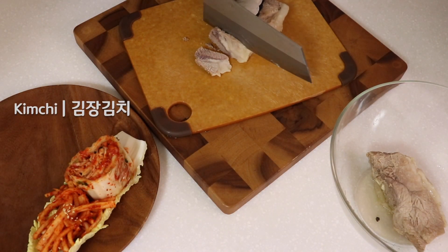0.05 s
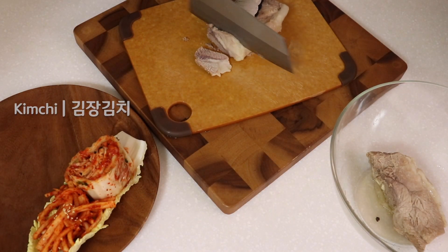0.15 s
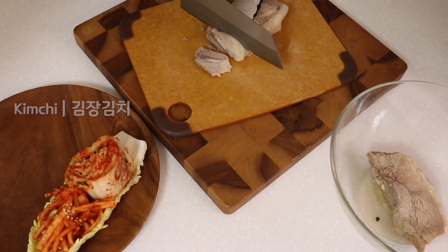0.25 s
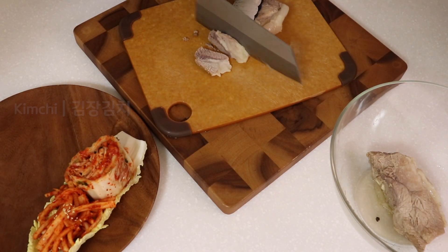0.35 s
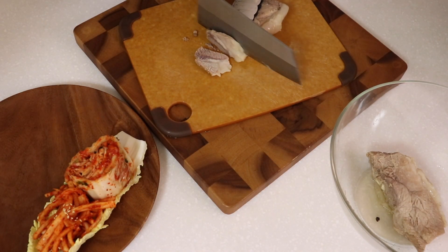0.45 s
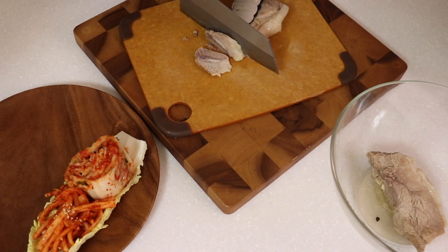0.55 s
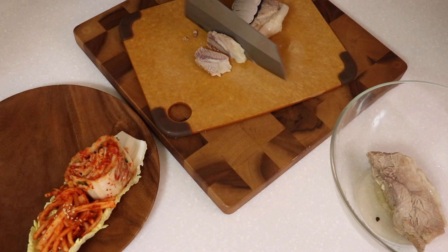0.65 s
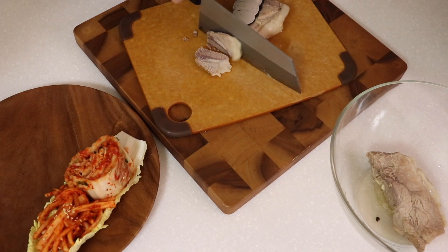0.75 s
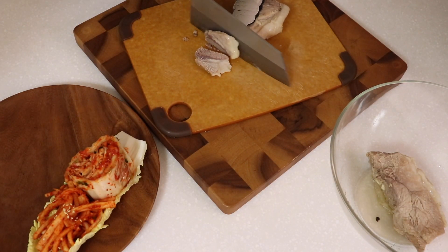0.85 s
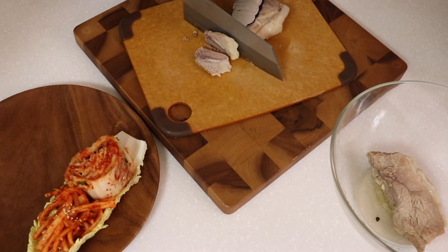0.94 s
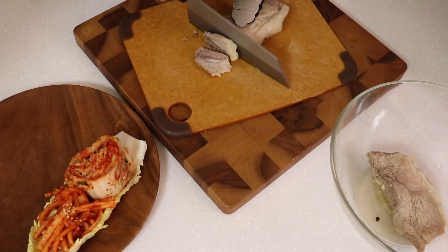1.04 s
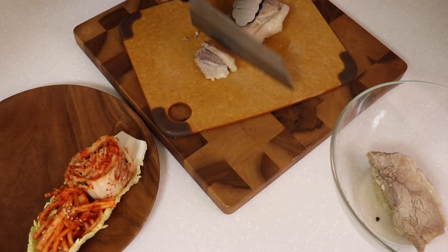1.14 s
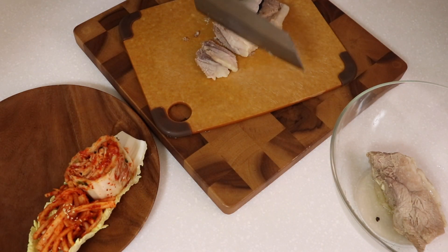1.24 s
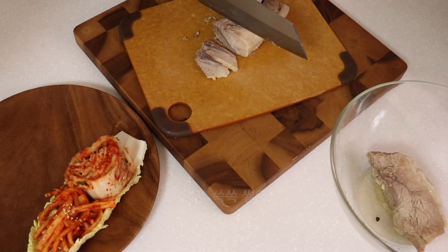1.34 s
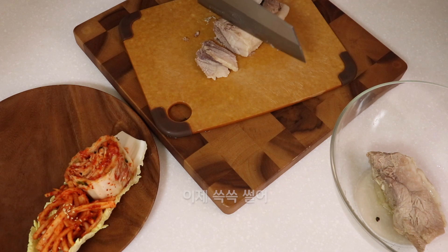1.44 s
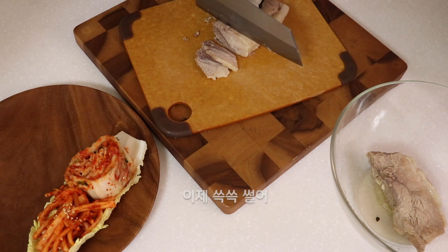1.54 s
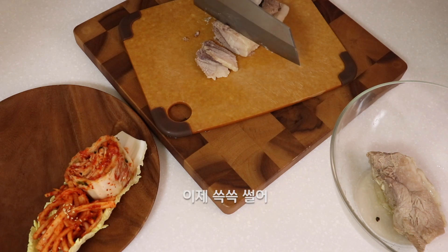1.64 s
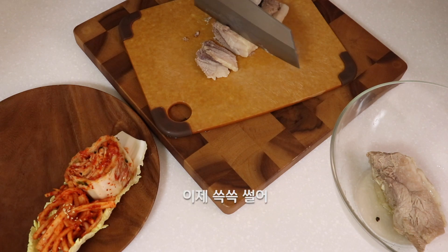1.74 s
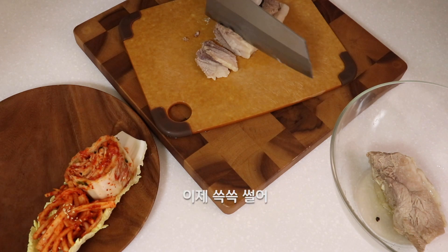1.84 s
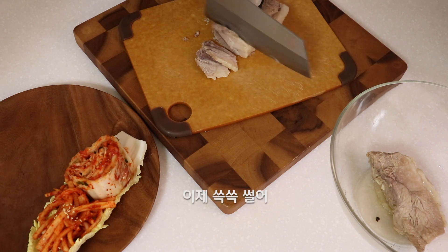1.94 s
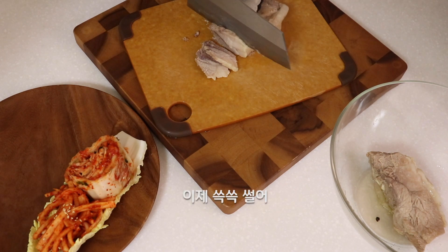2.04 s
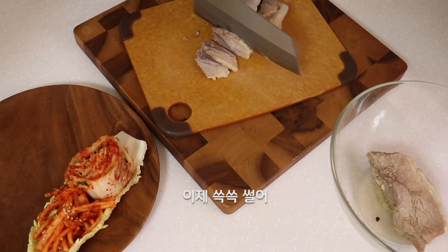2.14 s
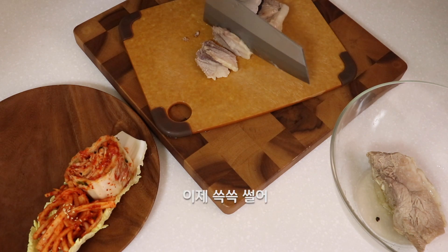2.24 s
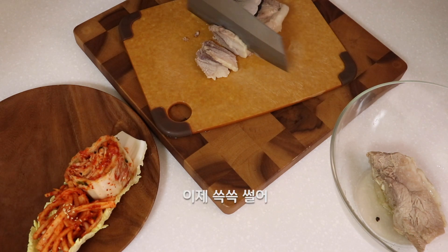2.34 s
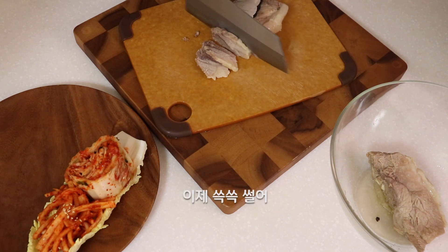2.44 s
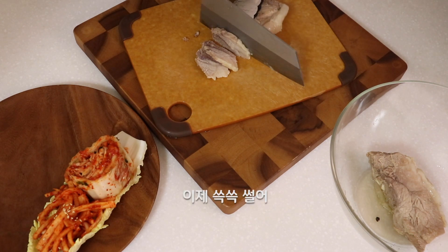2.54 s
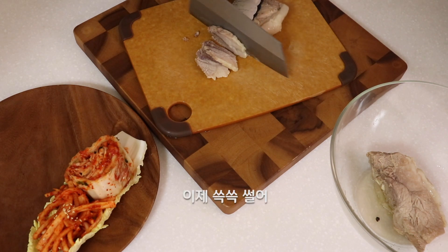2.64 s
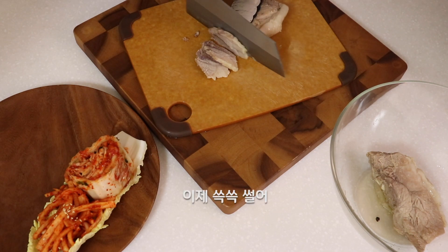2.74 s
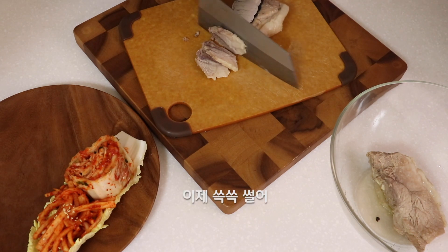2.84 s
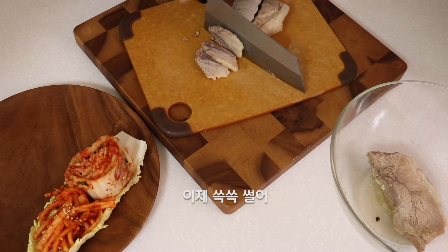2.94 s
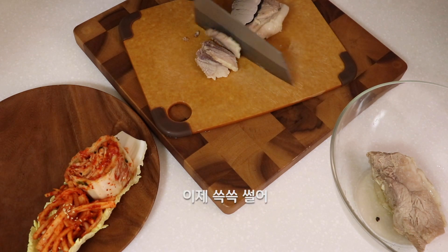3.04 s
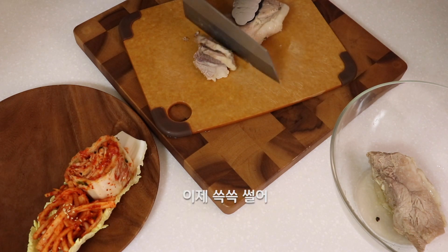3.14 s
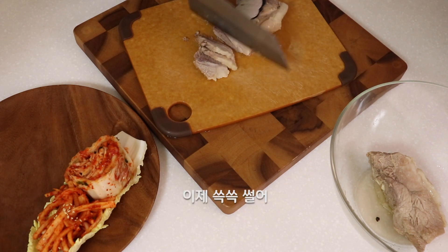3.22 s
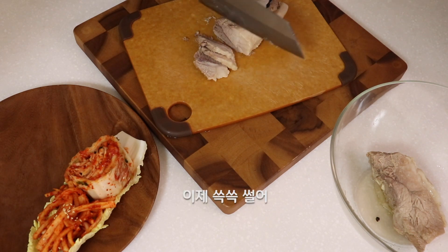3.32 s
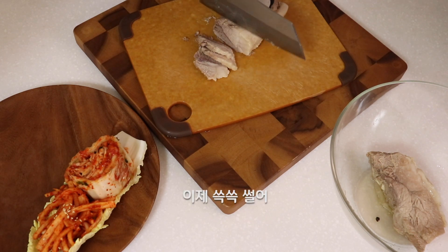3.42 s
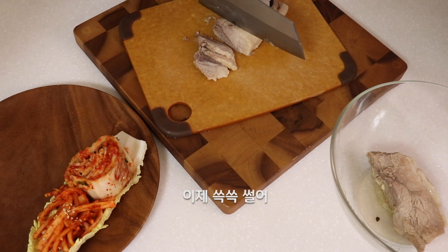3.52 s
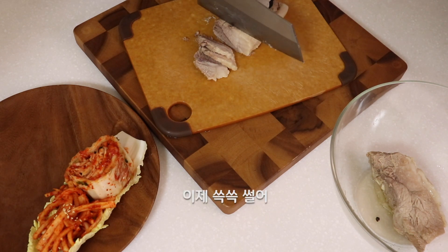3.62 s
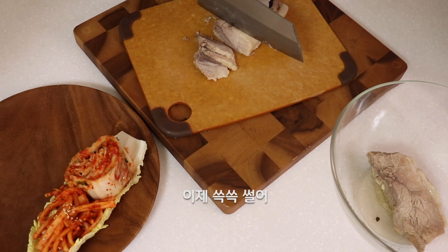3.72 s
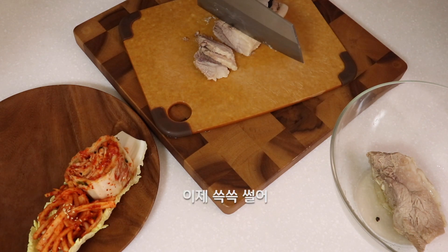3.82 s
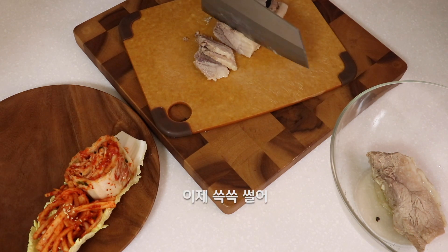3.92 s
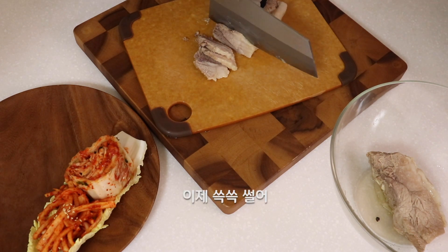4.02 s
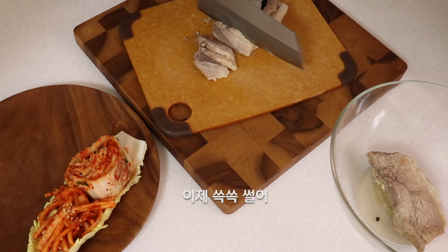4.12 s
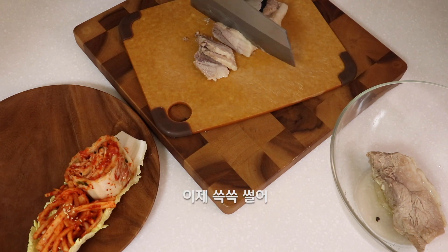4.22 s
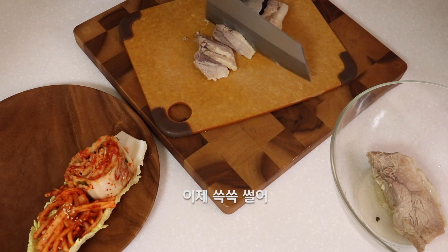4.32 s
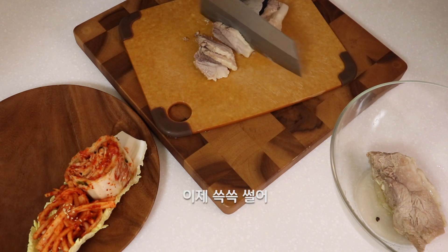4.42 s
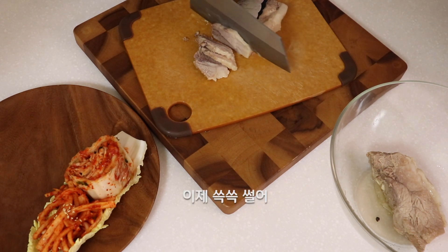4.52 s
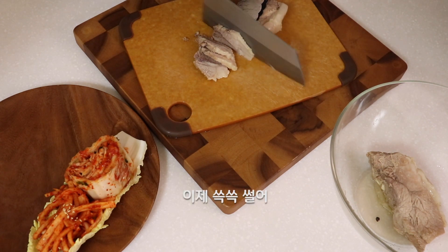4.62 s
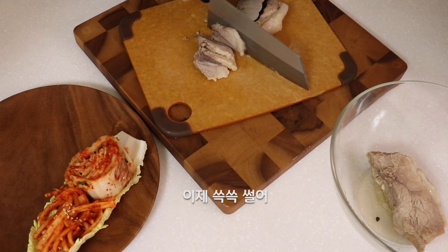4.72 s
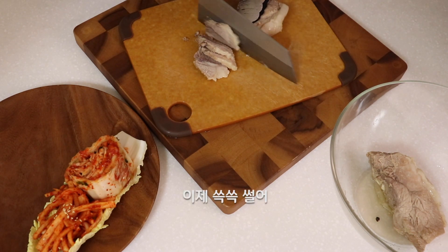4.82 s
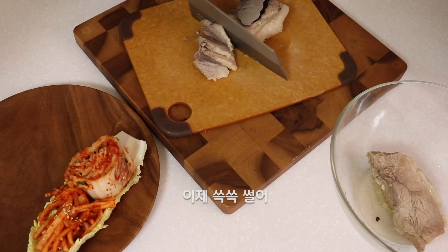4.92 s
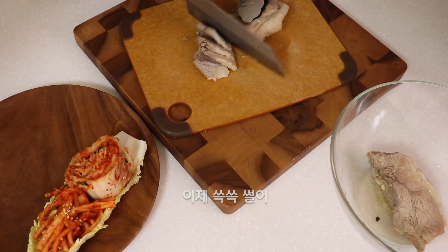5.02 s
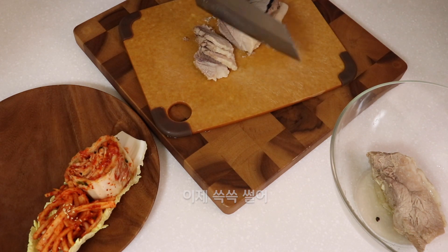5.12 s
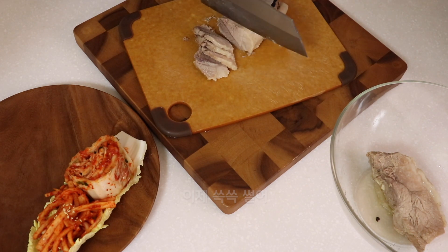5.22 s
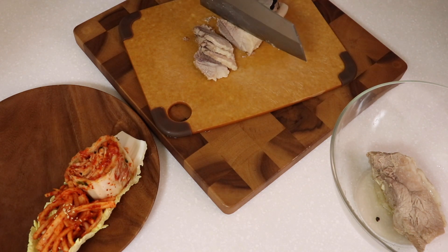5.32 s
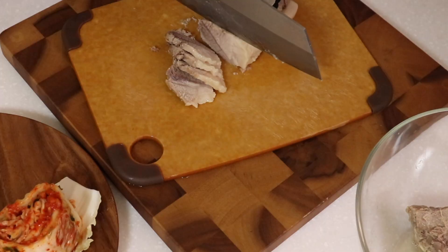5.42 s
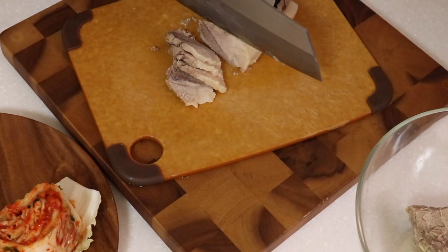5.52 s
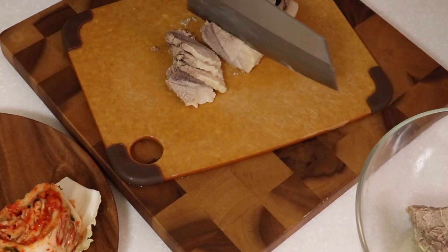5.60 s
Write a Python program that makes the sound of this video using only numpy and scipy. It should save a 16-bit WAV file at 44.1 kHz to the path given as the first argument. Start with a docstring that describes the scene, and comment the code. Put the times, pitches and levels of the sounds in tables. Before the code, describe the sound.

Close, quiet kitchen slicing: faint wet swishes, three woody knocks each followed by a scrape along the board, soft appliance hum behind.

```python
"""A broad kitchen knife saws three slices off a piece of boiled pork on a wooden board.
Each cut is a faint wet swish, a knock on the board, a drag along the wood and a flick that rings the blade.
Random tiny slips make the rubbing and tearing; decaying sine tones make the board and blade ring.
A small kitchen answers with a noise tail; an appliance hums with wavering tones over a rush of air."""
import sys
import numpy as np
from scipy import signal
from scipy.fft import rfft, irfft, next_fast_len
from scipy.io import wavfile
from scipy.ndimage import uniform_filter1d, minimum_filter1d

SR = 44100
rng = np.random.default_rng(int(sys.argv[2]) if len(sys.argv) > 2 else 0)


def wav_record(signal):
    """Record a signal, one row per channel, as 16-bit PCM in the file named by sys.argv[1]."""
    frames = np.transpose(np.atleast_2d(signal))
    bounded = np.clip(frames, -1, 1)
    # unit amplitude maps onto the largest positive 16-bit level
    quanta = np.round(bounded * 32767).astype(np.int16)
    wavfile.write(sys.argv[1], SR, quanta)


N = 249606
TIME = np.arange(N) / SR

# ringing tones of the board with the knife on it:
# (frequency [Hz], level [dB], time to fade by 60 dB [s])
BOARD_TONES = [(307, -47.5, 0.044), (369, -27, 0.028), (700, -13.5, 0.092), (738, -24.5, 0.44),
               (757, -12.5, 0.053), (1152.5, 2.5, 0.027), (1250, -12, 0.039), (1526, -13, 0.034),
               (1650, -7.5, 0.028), (1846, -14.5, 0.034), (2187, -8.5, 0.02), (2445, -2.5, 0.019),
               (3185, -12, 0.027), (3886, -8, 0.015), (5050, -11.5, 0.016), (5710, -21.5, 0.014),
               (7400, -12, 0.012), (8930, -5, 0.0047), (10000, -14.5, .007)]
# blade sliding through the meat, one row per stroke:
# (time [s], length [s], fizz level before trim [dB], swish level before trim [dB])
SAW_STROKES = [(0.0, 0.27, -73, -69.5), (0.355, 0.03, -65.5, -63), (0.395, 0.092, -61.5, -66.5),
               (0.512, 0.075, -64, -75), (0.6, .14, -69, -72.5), (0.73, 0.17, -69, -62),
               (1.868, 0.081, -69, -74), (2.0, .19, -72, -70), (2.18, 0.14, -66, -65),
               (2.32, 0.2, -69, -68), (2.49, 0.13, -66, -68.5), (2.63, 0.13, -70.5, -76),
               (2.82, 0.071, -65, -58), (3.98, 0.11, -67, -71), (4.315, 0.11, -64.5, -63),
               (4.45, 0.15, -69.5, -65.5), (4.612, 0.15, -64, -59)]
# edge dragged along the wood, a push and a draw after each knock:
# (time [s], length [s], then levels before trim: grating [dB], hiss [dB], low judder [dB])
DRAG_STROKES = [(0.868, 0.12, -48, -57.5, -44.5), (1.058, 0.088, -52, -60.5, -65),
                (2.935, 0.07, -48.5, -79, -36), (3.062, 0.12, -46.5, -50, -55),
                (4.81, 0.076, -49.5, -54.5, -54.5), (4.9, 0.092, -54.5, -64, -64)]
# edge skidding briefly on the wood:
# (time [s], bell width [s], grating [dB], hiss [dB], low judder [dB], push that rings the blade [dB])
EDGE_FLICKS = [(1.1332, 0.0049, -48, -46.5, -61, -57.5), (1.576, 0.0059, -77, -69, -78, -81),
               (3.1735, 0.0054, -45.5, -52, -54.5, -65), (5.013, 0.0042, -58.5, -57.5, -44.5, -72)]

SAW_SAG_DB_PER_S, SAW_RELEASE_S = 8, 0.021


def from_db(db):
    """Turn decibels into a plain multiplier."""
    return 10 ** (np.asarray(db) / 20)


def rms_one(x):
    """Scale a sound to an average (rms) strength of 1."""
    return x / np.sqrt(np.mean(x ** 2) + 1e-20)


def at_hz(points, hz, axis=1):
    """Read a table between its rows, on a log-frequency axis."""
    table = np.array(points)
    return np.interp(np.log(np.maximum(hz, 1)), np.log(table[:, 0]), table[:, axis])


def colour(x, spectrum):
    """Give a steady noise a balance of bass and treble, at rms 1."""
    size = next_fast_len(N)
    gain = from_db(at_hz(spectrum, np.fft.rfftfreq(size, 1 / SR)))
    return rms_one(irfft(rfft(x, size) * gain, size)[..., :N])


def strokes(rows, shape, axis):
    """Loudness over time: each stroke gathers speed, slackens as it goes and dies away."""
    attack_s, sag_db_per_s, release_s = shape
    out = np.zeros(N)
    for row in rows:
        start_s, length_s = row[:2]
        age = np.maximum(TIME - start_s, 0)
        rise = np.sin(np.pi / 2 * np.minimum(age / attack_s, 1)) ** 2
        overtime = np.maximum(age - length_s, 0)
        fall = np.exp(-np.minimum(overtime / release_s, 20))
        level_db = row[axis] - sag_db_per_s * np.minimum(age, length_s)
        out += from_db(level_db) * rise * fall
    return out


def swells(rows, axis):
    """Loudness over time: bell-shaped bumps from rows of (time [s], bell width [s], levels [dB])."""
    out = np.zeros(N)
    for row in rows:
        bell = np.exp(-np.minimum(((TIME - row[0]) / row[1]) ** 2 / 2, 40))
        out += from_db(row[axis]) * bell
    return out


def grains(per_s, spread_db):
    """Tiny slips at random moments, of uneven size and either direction, at rms 1."""
    sizes = from_db(spread_db * np.minimum(rng.exponential(1, N), 4))
    signs = rng.choice([-1, 1], N)
    happens = rng.random(N) < per_s / SR
    return rms_one(sizes * signs * happens)


def ring(force, modes):
    """Sum of decaying sine tones set off by a force; a steady push makes no sound."""
    out = 0
    for hz, db, t60 in modes:
        r = from_db(-60 / (t60 * SR))  # what is left of the ringing after one sample
        w = 2 * np.pi * hz / SR
        # the 1e-18 keeps the filter clear of very slow, tiny numbers
        tone = signal.lfilter([.5, 0, -.5], [1, -2 * r * np.cos(w), r * r], force + 1e-18)
        out = out + from_db(db) * tone
    return out


def diffuse(size):
    """Stereo noise arriving from all sides: alike in the bass, nearly unrelated in the treble."""
    # how alike left and right are: (frequency [Hz], likeness [0 to 1])
    likeness = [(60, 1), (130, 0.33), (300, 0.74), (700, 0.55), (1400, 0.07), (3000, 0.033), (15000, 0.06)]
    alike = np.clip(at_hz(likeness, np.fft.rfftfreq(size, 1 / SR)), -1, 1)
    mid, side = rfft(rng.standard_normal((2, size)))
    left_right = np.sqrt(1 + alike) * mid + np.sqrt(1 - alike) * side * [[1], [-1]]
    return irfft(left_right, size) / np.sqrt(2)


def place(x, pan_db, width):
    """Two close microphones hear similar bass; a glancing reflection makes their treble differ."""
    treble = signal.sosfilt(signal.butter(1, 2500, "high", fs=SR, output="sos"), x)
    reflection_delay_s = .00042
    side = width * np.interp(TIME - reflection_delay_s, TIME, treble)
    return np.array([x - side, x + side]) * from_db([[pan_db / 2], [-pan_db / 2]])


def meat_fizz(trim_db=-2.0, fibres_per_s=39, fibre_db=-10):
    """Wet fibres part with a fine fizz as the edge bites; weaker ones tick at random in each stroke."""
    # spectrum of the fizz: (frequency [Hz], relative level [dB])
    fizz_spectrum = [(1500, -19.5), (4000, -13.5), (6500, -1.5), (9500, -1.5), (12000, -3.5), (15500, -5.5)]
    # ticks of the weaker fibres: (frequency [Hz], level [dB], time to fade by 60 dB [s])
    fibre_ticks = [(3800, -2, 0.0011), (6400, 0, 0.0029), (9500, -1, .0013)]
    fibres = 0
    for tick in fibre_ticks:
        breaks = grains(per_s=fibres_per_s / len(fibre_ticks), spread_db=1.0)
        fibres = fibres + ring(breaks, [tick])
    fine = colour(grains(per_s=6400, spread_db=2.5), fizz_spectrum)
    tearing = fine + from_db(fibre_db) * rms_one(fibres)
    shape = 0.032, SAW_SAG_DB_PER_S, SAW_RELEASE_S  # the first number is the attack [s]
    return from_db(trim_db) * strokes(SAW_STROKES, shape, axis=2) * tearing


def blade_swish(trim_db=-1.5):
    """The flat of the blade follows the edge, so its swish of tiny slips builds more slowly."""
    # spectrum of the swish: (frequency [Hz], relative level [dB])
    swish_spectrum = [(400, -1), (1000, 0), (1800, 3), (2600, -0.5), (3800, 0), (6000, -8), (12000, -30)]
    slips = colour(grains(per_s=5000, spread_db=3.0), swish_spectrum)
    shape = 0.062, SAW_SAG_DB_PER_S, SAW_RELEASE_S  # the first number is the attack [s]
    return from_db(trim_db) * strokes(SAW_STROKES, shape, axis=3) * slips


def meat_rub():
    """Soft dull rubbing as the meat is pressed: random slips ring one low, short tone."""
    # rubbing: (time [s], length [s], level [dB])
    rub_strokes = [(0.0, 0.25, -69.5), (0.275, 0.0079, -59), (0.385, 0.19, -72), (1.41, 0.14, -70.5),
                   (1.568, .02, -61), (1.61, 0.17, -67.5)]
    slips = ring(grains(per_s=500, spread_db=6.0), [(829, 0, 0.018)])
    shape = 0.0022, 11, 0.0074  # attack [s], sag [dB per s], release [s]
    return strokes(rub_strokes, shape, axis=2) * rms_one(slips)


def kitchen(x, first_echo_s=0.0022, build_s=0.0037):
    """Echoes thicken into a tail of stereo noise; each frequency band fades at its own rate."""
    # bands of the room: (frequency [Hz], time to fade by 60 dB [s], level [dB])
    room_bands = [(150, 0.22, -1.5), (360, 0.74, -6), (750, 0.27, -2.5), (1170, 0.58, -9),
                  (1720, 0.5, -7.5), (4000, 0.46, -12.5), (9000, 0.95, -13.5), (15000, .2, -29)]
    t = TIME[:SR]
    hz, spectrum = np.fft.rfftfreq(SR, 1 / SR), rfft(diffuse(SR))
    centres = np.log([row[0] for row in room_bands])
    tail = 0
    for share, (_, t60, db) in zip(np.eye(len(room_bands)), room_bands):
        build = 1 - np.exp(-np.maximum(t - first_echo_s, 0) / build_s)
        decay = from_db(-60 * t / t60) * build
        # neighbouring bands overlap and fade into each other
        band = irfft(spectrum * np.interp(np.log(hz + 1), centres, share), SR)
        tail = tail + from_db(db) * band * decay / np.linalg.norm(decay)
    return signal.fftconvolve(x.mean(axis=0)[None], tail, axes=1)[:, :N]


def appliance(air_db=-66, waver_at_200_hz=0.11):
    """A motor hums near the mains rate over a soft rush of air; higher tones waver more in phase."""
    # spectrum of the air: (frequency [Hz], relative level [dB])
    air_spectrum = [(20, -29.5), (45, -4.5), (85, -13.5), (130, -14), (340, -12.5), (600, -16), (1600, -20),
                    (2500, -21), (4500, -26), (7300, -30), (14000, -34), (15500, -30)]
    # hum tones: (frequency [Hz], rms level [dB])
    hum_tones = [(59.6, -64), (119.2, -96), (238.4, -82), (255, -88), (356.5, -80), (415, -83), (775, -89)]
    out = from_db(air_db) * colour(diffuse(N), air_spectrum)
    knots = np.linspace(0, TIME[-1], 30)
    for hz, db in hum_tones:
        drift = np.interp(TIME, knots, rng.standard_normal(len(knots)))
        wander = waver_at_200_hz * hz / 200 * drift  # radians
        out = out + from_db(db) * np.sqrt(2) * np.sin(2 * np.pi * hz * TIME + wander)
    return out


def snaps(ring_s=0.0012, crackle_db=-14.5, crackle_s=0.0028):
    """The strongest moist fibres break, each with one sharp tick and a trace of crackle."""
    # snaps: (time [s], level [dB], frequency [Hz])
    snap_rows = [(0.2313, -46.5, 11600), (0.4188, -42, 7500), (0.532, -42, 6950), (0.7286, -45, 9900),
                 (2.202, -48.5, 3750), (2.5726, -44, 6600), (4.096, -42.5, 5000), (4.7181, -43, 8650),
                 (5.3354, -55, 11700)]
    out, length = np.zeros(N), SR // 20
    for s, db, hz in snap_rows:
        tone = [(hz, 0, ring_s)]
        tick = ring(signal.unit_impulse(length), tone)
        noise = rms_one(ring(rng.standard_normal(length), tone))
        crackle = from_db(crackle_db) * np.exp(-TIME[:length] / crackle_s) * noise
        start = round((s + 0.00043) * SR)  # a snap starts just after its listed time
        out[start:start + length] += from_db(db) * (tick + crackle)
    return out


def knocks(main_tone_hz=1126):
    """The edge lands and chatters; meat under it softens the blow, and the spot sets the main tone."""
    # edge meets board: (time [s], strength [dB], contact brightness [Hz],
    # main tone change at that spot [dB], gap between touches [s], change per rebound [dB])
    knock_rows = [(0.8141, -15, 1850, -5.5, .0027, -12), (2.8916, -14, 5000, -0.5, .0026, -15.5),
                  (4.7487, -21, 824, -7, .0072, -15)]
    out = np.zeros(N)
    for s, db, bright_hz, spot_db, gap_s, loss_db in knock_rows:
        start, touches = round(s * SR), np.zeros(SR)
        for k in range(4):
            touches[round(k * gap_s * SR)] += from_db(db + k * loss_db)
        # a softer contact spreads each touch out in time
        r = np.exp(-2 * np.pi * bright_hz / SR)
        force = signal.lfilter([(1 - r) ** 2], [1, -2 * r, r * r], touches + 1e-18)
        modes = []
        for hz, level, t60 in BOARD_TONES:
            is_main = abs(hz / main_tone_hz - 1) < .06
            modes.append((hz, level + spot_db * is_main, t60))
        out[start:start + SR] += ring(force, modes)[:N - start]
    return out


def edge_on_wood(axis, drag_trim_db):
    """Loudness of the edge rubbing on wood: trimmed long drags plus the brief flicks."""
    shape = 0.03, 24.5, 0.028  # attack [s], sag [dB per s], release [s]
    return from_db(drag_trim_db) * strokes(DRAG_STROKES, shape, axis) + swells(EDGE_FLICKS, axis)


def shake_board(slips, loudness):
    """Slips shake the board; the dragging blade leans on it, so no tone rings for long."""
    longest_t60_s = 0.065
    pressed = [(hz, db, min(t60, longest_t60_s)) for hz, db, t60 in BOARD_TONES]
    return ring(slips * loudness, pressed) / ring(slips, pressed).std()


def grating(pressure):
    """The edge catches on the grain, and thousands of slips a second shake the board."""
    # spectrum of the grating slips: (frequency [Hz], relative level [dB])
    grate_spectrum = [(200, 2.5), (400, 10), (700, 1.5), (1150, 8.5), (1800, 9.5), (3000, 9), (4500, 7.5),
                      (7000, -16), (14000, -1)]
    return shake_board(colour(grains(per_s=4600, spread_db=3.5), grate_spectrum), pressure)


def judder():
    """Heavy, slower slips reach mainly the board's low tones."""
    # spectrum of the heavy slips: (frequency [Hz], relative level [dB])
    judder_spectrum = [(200, 0), (500, -12.5), (740, 6.5), (1100, -10.5), (2500, -42), (8000, -58)]
    jolts = colour(grains(per_s=680, spread_db=2.0), judder_spectrum)
    return shake_board(jolts, edge_on_wood(axis=4, drag_trim_db=-5.5))


def wood_hiss(speed):
    """Very dense slips of the edge on the grain hiss."""
    # spectrum of the hiss: (frequency [Hz], relative level [dB])
    hiss_spectrum = [(600, -13), (1500, 5), (2800, -0.5), (4500, 1.5), (6500, -3), (10000, -3.5),
                     (12000, -10), (15500, -16.5)]
    return colour(grains(per_s=9000, spread_db=3.5), hiss_spectrum) * speed


def shaken_blade(loudness, level_db=-15.5):
    """The slips also shake the steel: noise rings the short tones of a blade gripped by the meat."""
    # gripped blade: (frequency [Hz], level [dB], time to fade by 60 dB [s])
    gripped_tones = [(2512, 4, 0.021), (3680, -5, 0.024), (3970, -23, 0.049), (4600, 0, 0.054),
                     (5000, -11.5, 0.028), (6370, -1.5, 0.018), (7360, -10.5, 0.035), (9200, -10, 0.069),
                     (9540, -15.5, 0.036)]
    return from_db(level_db) * loudness * rms_one(ring(rng.standard_normal(N), gripped_tones))


def freed_blade():
    """At each flick the blade springs free and rings from one sudden push."""
    # free steel blade: (frequency [Hz], level [dB], time to fade by 60 dB [s])
    free_tones = [(2570, 6, 0.081), (5184, -0.5, 0.26), (5920, -2, 0.22), (6600, -3, 0.15),
                  (8100, -6, 0.27), (8760, 9, 0.057), (9500, -14, 0.22), (11000, -2, 0.27),
                  (13700, -9, 0.13)]
    release = np.zeros(N)
    for s, *_, ring_db in EDGE_FLICKS:
        release[round(s * SR)] = from_db(ring_db)
    return ring(release, free_tones)


def squelches(width_hz=320):
    """The wet gap beside the blade resonates as it opens, its pitch sliding as it changes size."""
    # squelches: (time [s], bell width [s], level [dB], pitch at that time [Hz], glide [octaves per s])
    squelch_rows = [(2.247, .012, -75, 1800, 2), (2.284, 0.011, -65.5, 1327, -5),
                    (2.755, .014, -72.5, 1560, -12), (4.396, 0.016, -66.5, 1824, -0.5),
                    (4.496, 0.0159, -71, 3350, 0.5), (4.666, .02, -60.5, 1927, -3.5),
                    (4.725, .016, -64, 2500, 0)]
    out, narrow = np.zeros(N), signal.butter(2, width_hz / 2, fs=SR, output="sos")
    for s, half_s, db, hz, glide in squelch_rows:
        pitch = hz * 2 ** (glide * np.clip(TIME - s, -2 * half_s, 2 * half_s))
        phase = 2 * np.pi * np.cumsum(pitch) / SR
        # slow noise on a sine and a cosine makes a narrow band of noise around the pitch
        flutter = rms_one(signal.sosfilt(narrow, rng.standard_normal((2, N))))
        wet = flutter[0] * np.cos(phase) + flutter[1] * np.sin(phase)
        out += swells([(s, half_s, db)], axis=2) * wet
    return out


def scene():
    """Knife work close by, the room's answer and the appliance behind it."""
    meat = meat_fizz() + blade_swish() + meat_rub() + snaps() + squelches()
    pressure = edge_on_wood(axis=2, drag_trim_db=-5.5)
    speed = edge_on_wood(axis=3, drag_trim_db=-4.5)
    drag = grating(pressure) + judder() + wood_hiss(speed)
    drag = drag + shaken_blade(pressure + speed) + freed_blade()
    work = place(meat, pan_db=-2.4, width=0.55)
    work = work + place(knocks(), pan_db=-1.2, width=0.18)
    work = work + place(drag, pan_db=-1.0, width=0.58)
    return work + kitchen(work) + appliance()


def record(dry, microphone_hz=13000, ceiling=.2, cutoff_hz=15600):
    """The microphone dulls the top, a very fast limiter holds peaks down, the highest treble is cut."""
    heard = signal.sosfilt(signal.butter(2, microphone_hz, fs=SR, output="sos"), dry)
    needed = ceiling / np.maximum(np.abs(heard).max(axis=0), ceiling)
    # hold the lowest gain nearby, then smooth it (windows in samples)
    gain = uniform_filter1d(minimum_filter1d(needed, size=25), size=25)
    steep_cut = signal.ellip(10, .1, 70, cutoff_hz, fs=SR, output="sos")
    return signal.sosfilt(steep_cut, heard * gain)


dry = scene()
out = record(dry)
wav_record(out)
```